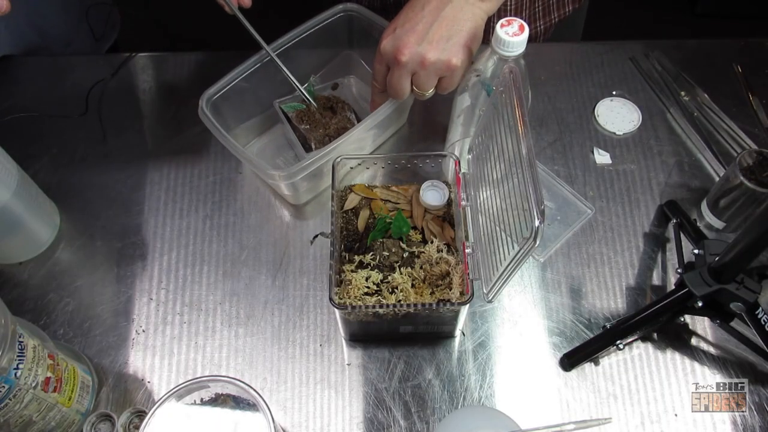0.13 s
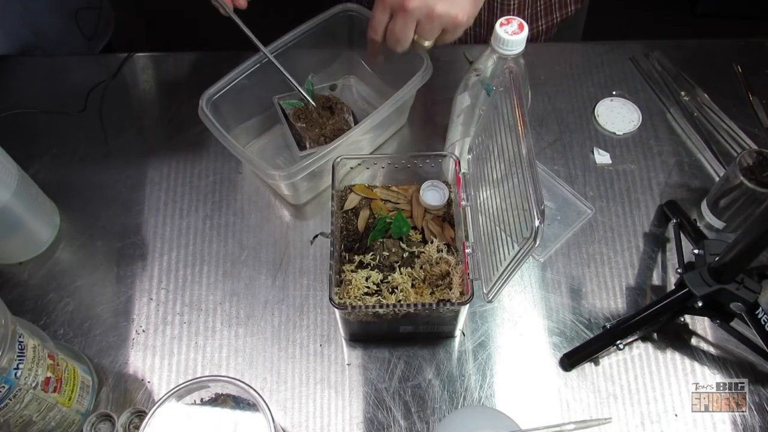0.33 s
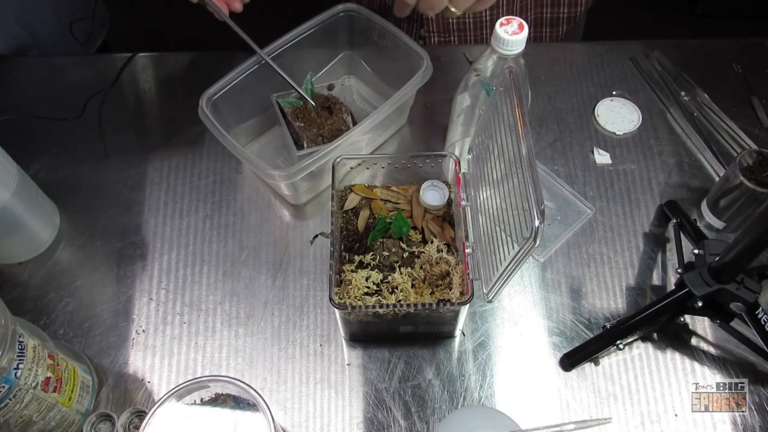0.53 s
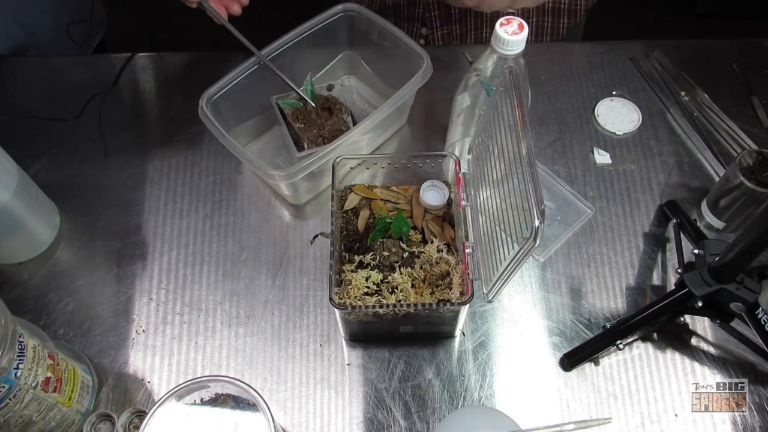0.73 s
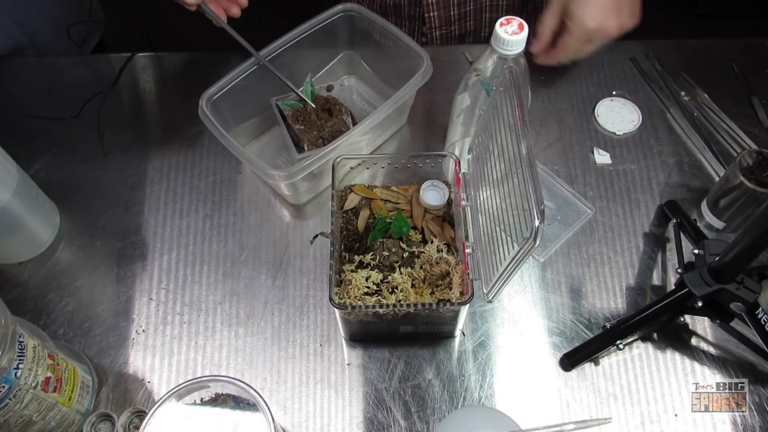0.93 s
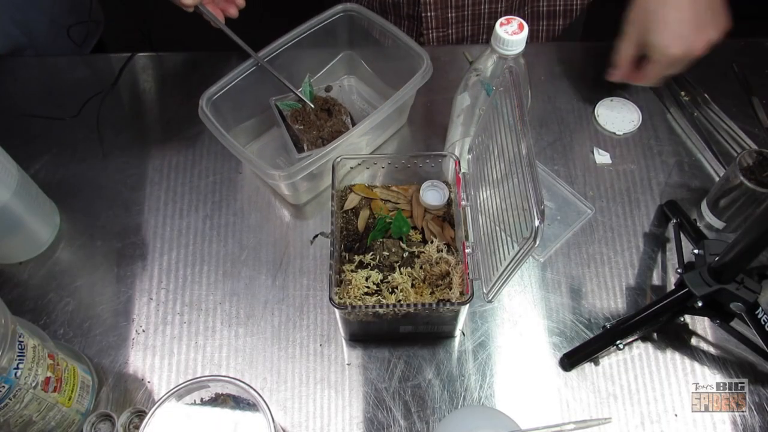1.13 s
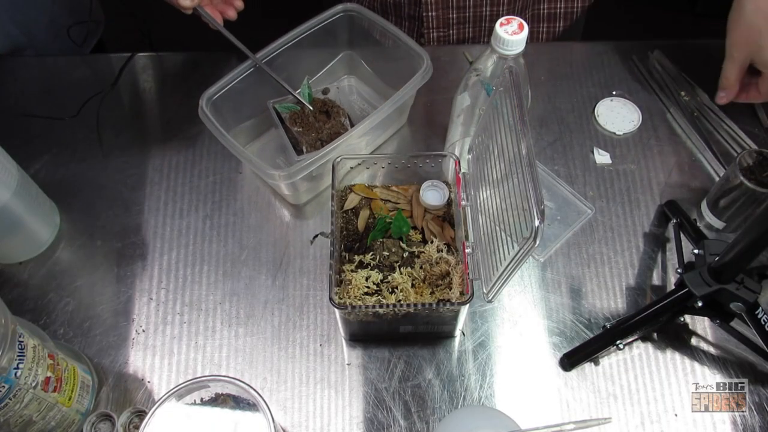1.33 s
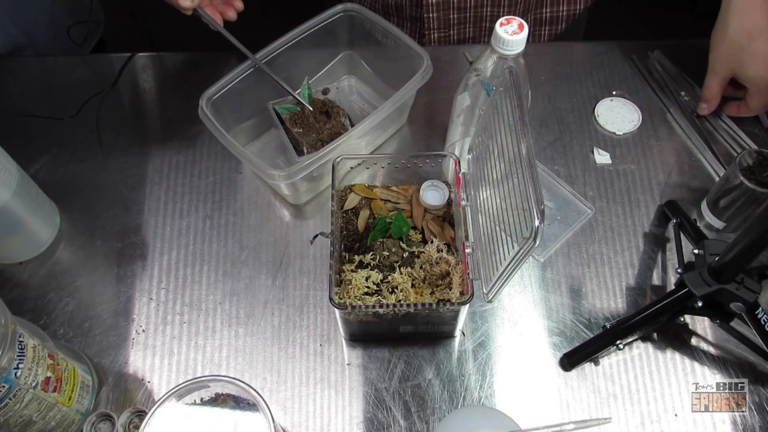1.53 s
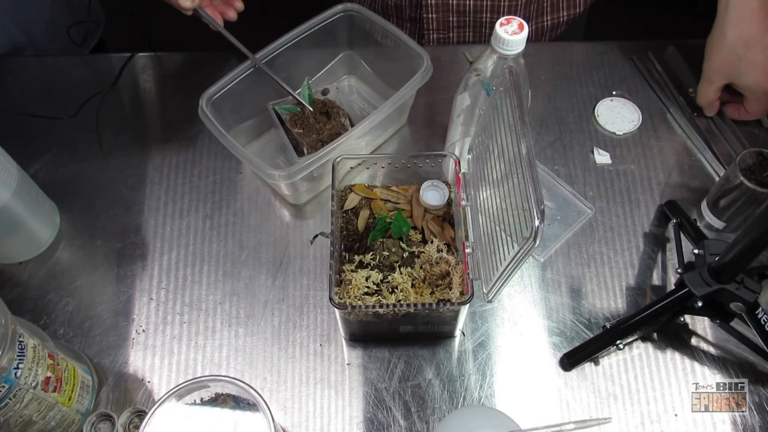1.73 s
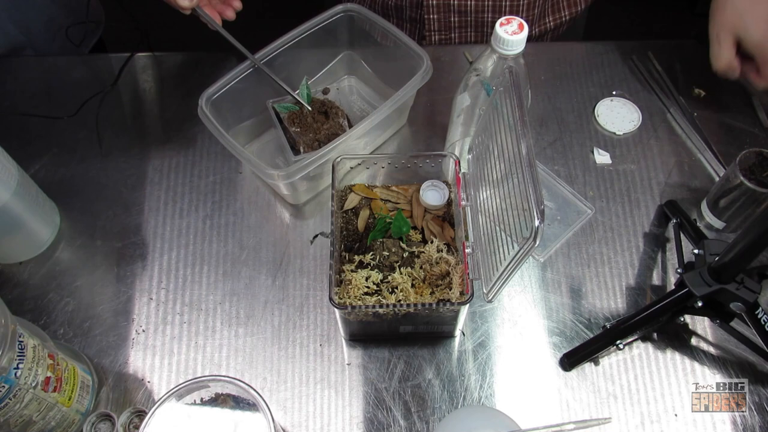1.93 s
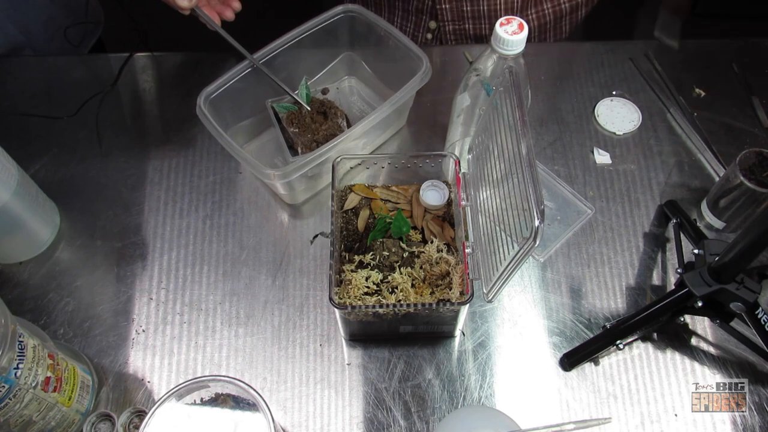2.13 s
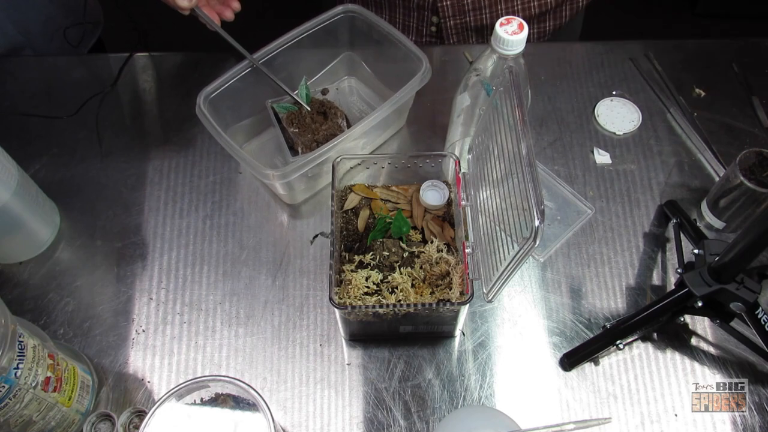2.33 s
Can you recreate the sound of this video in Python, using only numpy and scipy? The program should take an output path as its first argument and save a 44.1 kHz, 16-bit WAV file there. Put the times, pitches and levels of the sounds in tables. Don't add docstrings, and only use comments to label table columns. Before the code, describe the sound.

Tweezers and a hand knock a plastic tub: small ticks and a brief rub at 0.1 s, a loud hollow knock at 0.2 s, then weaker damped knocks until 0.3 s. A sleeve rustles faintly, with soft soil thumps around 0.5, 0.9 and 1.1-1.35 s. Steel tools clack brightly on a metal table at 1.64 and 1.84 s, then tap and scrape lightly until 2.4 s in a quiet small room.

```python
import sys
import numpy as np
from scipy import signal
from scipy.fft import rfft, irfft
from scipy.io import wavfile
from scipy.ndimage import uniform_filter1d

SR = 44100
rng = np.random.default_rng(int(sys.argv[2]) if len(sys.argv) > 2 else 0)


def to_wav(s):
    ch = np.atleast_2d(s).T
    pcm = np.round(np.clip(ch, -1, 1) * 32767)
    wavfile.write(sys.argv[1], SR, pcm.astype(np.int16))


def boost(x):
    u = np.asarray(x, float) / 20
    return 10 ** u


N = 105840

# frequency in Hz, t60 in seconds.
ROOM_T60 = [(200, 0.2), (1000, 0.63), (4000, 0.41), (12000, 0.22)]


def at_hz(points, hz):
    p = np.array(points)
    return np.interp(np.log(np.maximum(hz, 1)), np.log(p[:, 0]), p[:, 1])


def in_time(rows):
    s, db = np.transpose(rows)
    return boost(np.interp(np.arange(N) / SR, s, db))


def rms_one(x):
    return x / np.sqrt(np.mean(x ** 2) + 1e-20)


def noise():
    return rng.standard_normal(N)


def colour(x, spectrum):
    gain = boost(at_hz(spectrum, np.arange(N // 2 + 1) * SR / N))
    return irfft(rfft(x) * rms_one(gain), N)


def rippled(x):
    ripple_db, ripple_hz = 2.5, 40
    size = max(int(ripple_hz * N / SR), 3)
    bumps = uniform_filter1d(rng.standard_normal(N // 2 + 1), size=size)
    bumps = rms_one(uniform_filter1d(bumps, size=size))
    return irfft(rfft(x) * rms_one(boost(ripple_db * bumps)), N)


def drift(rate):
    r = np.exp(-2 * np.pi * rate / SR)
    settle = 9000
    slow = signal.lfilter([1], [1, -2 * r, r * r], rng.standard_normal(N + settle))
    return rms_one(slow[settle:])


def fall(start, t60):
    out, i, t60 = np.zeros(N), int(start * SR), max(t60, .002)
    steps = np.arange(min(N - i, int(1.5 * t60 * SR)))
    out[i:i + len(steps)] = np.exp(-np.log(1000) * steps / SR / t60)
    return out


def click(s, db):
    x = np.zeros(N)
    x[(np.asarray(s) * SR).astype(int)] = boost(db)
    return x


def ring(clicks, hz, t60):
    r, w = boost(-60 / (t60 * SR)), 2 * np.pi * hz / SR
    return signal.lfilter([0, np.sin(w)], [1, -2 * r * np.cos(w), r * r], clicks + 1e-18)


def strike(rows, modes, spread_db):
    s, db = np.transpose(rows)
    luck = rng.standard_normal((len(s), len(modes)))
    out = 0
    for k, (hz, level_db, t60) in enumerate(modes):
        hits = click(s, db + level_db + spread_db * luck[:, k])
        out = out + (-1) ** k * ring(hits, hz, t60)
    return out


def dying_noise(starts, spectrum, t60s):
    out, edges = 0, 130 * 2 ** np.arange(0, 7.1, .5)
    white = [rippled(colour(noise(), spectrum)) for _ in range(2)]
    for k, (low, high) in enumerate(zip(edges, edges[1:])):
        sos = signal.butter(2, [low, high], "band", fs=SR, output="sos")
        band = signal.sosfilt(sos, white[k % 2])
        t60 = at_hz(t60s, np.sqrt(low * high))
        out = out + band * sum(boost(db) * fall(s, t60) for s, db in starts)
    return out


def sliding_grains():
    grains_per_s = 3500
    sizes = boost(4.5 * np.minimum(rng.exponential(1, N), 3)) * rng.choice([-1, 1], N)
    grains = sizes * (rng.random(N) < grains_per_s / SR)
    return .7 * rms_one(grains) + .7 * noise()


def room_air():
    # frequency in Hz, density in dB per Hz.
    air_spectrum = [(15, -3), (50, -1), (95, -3), (150, 2.5), (300, -17.5), (1200, -41.5), (4000, -38.5),
                    (16000, -42)]
    return boost(-60) * colour(noise(), air_spectrum)


def sleeve():
    # time in seconds, level in dB.
    motion = [(.3, -59), (.55, -64), (.8, -57), (.92, -62), (1.15, -57), (1.27, -63), (1.38, -59),
              (1.52, -72.5), (1.7, -75.5)]
    # frequency in Hz, density in dB per Hz.
    cloth = [(120, -11), (250, -2.5), (400, 1.5), (1200, -9), (2200, -22), (4000, -26.5), (8500, -27),
             (12000, -50)]
    flutter = boost(1.2 * drift(20))
    return in_time(motion) * flutter * boost(-0.5) * colour(noise(), cloth)


def hand_rub():
    # time in seconds, level in dB.
    motion = [(0, -69.5), (.04, -51), (.08, -108), (.095, -75), (.099, -48), (.15, -43.5), (.18, -51),
              (.205, -59.5), (.23, -83.5)]
    # frequency in Hz, density in dB per Hz.
    plastic = [(90, -15.5), (150, -5), (600, -5), (1200, -16), (2700, -19), (8000, -37), (14000, -50)]
    uneven = boost(1.2 * drift(40))
    return uneven * in_time(motion) * colour(sliding_grains(), plastic)


def ticks():
    # start in seconds, level in dB,
    # centre in Hz, t60 in seconds.
    contacts = [(0.032, -77, 2400, .05), (0.097, -37.5, 1900, 0.15), (0.107, -41.5, 4700, 0.053),
                (.143, -55, 4000, .015), (.168, -48, 4800, 0.045), (.511, -57, 800, .02),
                (.70, -67, 2500, 0.34), (.757, -64.5, 3280, 0.29), (0.855, -61, 2200, 0.016),
                (.945, -71, 11000, 0.0091), (.955, -70, 2500, 0.013), (1.143, -50.5, 2500, 0.018),
                (1.185, -74, 7800, .01), (1.279, -66, 6800, 0.011), (2.101, -60, 10000, 0.04)]
    snap = 0.77
    out, grit = 0, noise()
    for s, db, hz, t60 in contacts:
        b, a = signal.iirpeak(hz, 1, fs=SR)
        burst = grit * fall(s, t60) + snap * click([s], 0) + 1e-18
        out = out + boost(db + 5.5) * signal.lfilter(b, a, signal.lfilter(b, a, burst))
    return out


def tweezer_tips():
    # time in seconds, level in dB.
    touches = [(.0965, -54), (.1060, -49), (.1435, -51), (.1680, -55), (.5110, -64), (1.1074, -47.5),
               (1.1079, -63), (1.1450, -59), (1.3490, -56), (1.3500, -63), (2.2255, -63)]
    # frequency in Hz, level in dB, t60 in seconds.
    tip_modes = [(910, -1, 0.017), (1700, -4.5, 0.01), (2500, 1, 0.015), (3400, -19, 0.0035),
                 (4370, -11.5, .014), (5200, -7, 0.015), (6360, -14, .008), (7840, -20, .008)]
    return strike(touches, tip_modes, spread_db=2.5)


def thumps():
    # time in seconds, level in dB, pitch in Hz.
    pushes = [
        (0.145, -45, 198),
        (.510, -48, 217),
        (0.857, -39.5, 149),
        (.955, -44.5, 214),
        (1.111, -39, 170),
        (1.148, -38.5, 143),
        (1.352, -47, 133),
        (1.986, -45.5, 215),
        (2.225, -43.5, 326),
    ]
    # frequency in Hz, density in dB per Hz.
    puff = [(150, -1), (350, 1), (900, -3.5), (2500, -23.5), (5000, -25.5), (9000, -72)]
    out = colour(noise(), puff) * sum(boost(db - 9) * fall(s, 0.13) for s, db, hz in pushes)
    out = signal.sosfilt(signal.butter(2, 5000, fs=SR, output="sos"), out)
    for s, db, hz in pushes:
        push = signal.lfilter(np.hanning(90) / 44.5, 1, -click([s], db))
        velocity = np.gradient(push) * SR / (2 * np.pi * hz)
        out = out + ring(velocity, hz, 0.075)
        out = out + boost(-8) * ring(push, 1.5 * hz, 0.09)
        out = out + boost(-25) * ring(push, 5.4 * hz, 0.012)
    return out


def tub():
    # time in seconds, peak in dB, extra treble in dB.
    knocks = [
        (0.2154, -14, -1),
        (.2203, -41.5, 24),
        (0.244, -30, -6.5),
        (0.2703, -25, -12),
        (0.292, -30.5, -1.5),
    ]
    # frequency in Hz, level in dB, t60 in seconds.
    wall_modes = [(259.3, -15.5, 0.18), (347.6, 3.5, 0.036), (490.4, 2, 0.037), (523.5, -13, 0.12),
                  (747, -16.5, 0.025), (1576, -21, 0.075), (2060, -27, 0.022), (2213, -25.5, 0.077),
                  (2350, -29, 0.065), (3650, -26, .04), (4620, -10, 0.01)]
    # frequency in Hz, level in dB, t60 in seconds.
    cavity = (417, 0.92, 0.091)
    # frequency in Hz, density in dB per Hz.
    rattle_spectrum = [(300, -20), (700, 11), (2200, 9), (3300, -1), (5000, -3), (8300, -20), (9500, -42),
                       (16000, -50)]
    # time in seconds, level in dB.
    crackles = [(.2155, -46), (.2206, -46), (.2260, -50), (.2332, -50), (.2418, -50.5), (.2470, -59),
                (.2620, -61), (.2700, -64), (.2780, -58), (.2840, -59), (.2932, -52), (.2965, -58.5)]
    # frequency in Hz, level in dB, t60 in seconds.
    rim_modes = [(4580, -4.5, 0.022), (5380, -6, .008), (6570, -2.5, .008), (7560, -2.5, 0.0062),
                 (8670, -12.5, 0.0031)]
    held = .45
    flip_hz = 400
    s, db, treble_db = np.transpose(knocks)
    wall = 0
    for rows, damping in [(slice(0, 2), 1), (slice(2, None), held)]:
        for hz, level_db, t60 in wall_modes + [cavity]:
            lag_s = .00075 if hz == cavity[0] and damping == 1 else 0
            hit_db = db + treble_db * (hz > 1000)
            hit = signal.lfilter(np.hanning(12) / 5.5, 1, click(s[rows] + lag_s, hit_db[rows]))
            wall = wall + np.sign(flip_hz - hz) * boost(level_db) * ring(hit, hz, t60 * damping)
    wall = signal.sosfilt(signal.butter(1, 90, "high", fs=SR, output="sos"), wall)
    rattle_fall = sum(boost(d + e - db[0]) * fall(t, 0.15) for t, d, e in knocks)
    rattle = boost(-41.5 + 2 * drift(150)) * colour(noise(), rattle_spectrum) * rattle_fall
    echoes = [(s[0] + 0.0079, db[0] - 19), (s[3] + 0.0046, db[0] - 32.5)]
    echo_spectrum = [(120, -11), (250, 1.0), (450, 4.5), (700, -19.0), (2000, -35.0), (9000, -51)]
    room = dying_noise(echoes, echo_spectrum, ROOM_T60)
    return wall + rattle + room + strike(crackles, rim_modes, spread_db=4)


def pings():
    starts = [.3265, 1.593, 2.010, 2.042, 2.050, 2.098, 2.255, 2.293, 2.386]
    # level in dB, frequency in Hz, t60 of the drive in seconds.
    rings = [(-61.5, 4300, 0.26), (-72, 4200, 0.055), (-55.5, 2310, 0.13), (-54, 2630, 0.051),
             (-55, 2920, 0.17), (-67, 15400, .06), (-54.5, 2300, 0.028), (-48.5, 2580, 0.051),
             (-80, 3700, 0.1)]
    blur_s = .016
    out, grit = 0, noise()
    for s, (db, hz, t60) in zip(starts, rings):
        out = out + boost(db - 11) * ring(grit * fall(s, t60), hz, blur_s)
    return out


def clacks():
    # time in seconds, level in dB, bounce delay in seconds, bounce level in dB.
    landings = [
        (1.639, -24.5, .058, -19),
        (1.8390, -28, 0.059, -27),
    ]
    # frequency in Hz, level in dB, t60 in seconds.
    first_tool = [(200.4, -4, 0.2), (361.3, 4, 0.21), (975, 1.5, .06), (603, -2.5, 0.099), (1070, 7, 0.072),
                  (2073, 1, 0.045), (3580, -6, 0.32), (4116, 1.5, 0.11), (5150, 2, 0.07), (6240, -9, 0.27),
                  (7957, 0, 0.11), (8330, -10, 0.077), (11130, -11, 0.13), (11130, 2.5, 0.044)]
    second_tool = [(332.5, -0.5, 0.11), (810, 2.5, 0.19), (1567, 9.5, 0.036), (1610, -4, 0.23),
                   (2090, 0.5, 0.096), (2650, 4, 0.078), (3400, -1, .08), (4097, -5, 0.13),
                   (4500, 0.5, 0.12), (6040, -5, .13), (6980, 2.5, .07), (8940, 4.5, 0.049),
                   (10590, 3, 0.056), (11750, 5, 0.032)]
    ring_levels = [-36.5, -38]
    # frequency in Hz, density in dB per Hz.
    first_sheet = [(120, -11.5), (250, -9), (600, -12.5), (1040, -2.5), (1500, -9.5), (3000, -12),
                   (9000, -6), (15500, -11.5)]
    second_sheet = [(120, -11.5), (330, -8), (600, -8), (1500, -1.5), (2700, -5), (6000, -6), (11500, -4),
                    (15500, -13)]
    # frequency in Hz, t60 in seconds.
    sheet_t60 = [(200, 0.76), (1000, 0.22), (4000, 0.16), (12000, 0.047)]
    room_db = -14
    out = 0
    for (s, db, later, bounce_db), modes, ring_db, sheet in zip(
            landings, [first_tool, second_tool], ring_levels, [first_sheet, second_sheet]):
        contacts = [(s + 0.00072, db - 5), (s + 0.003, db - 14), (s + later, db + bounce_db)]
        out = out + dying_noise(contacts, sheet, sheet_t60)
        out = out + dying_noise([(s + 0.0049, db + room_db)], sheet, ROOM_T60)
        hits = click([s, s + later], [ring_db, ring_db + bounce_db])
        for k, (hz, level_db, t60) in enumerate(modes):
            out = out + (-1) ** k * boost(level_db) * ring(np.roll(hits, 9 * k), hz, t60)
    return out


def tool_slide():
    # time in seconds, level in dB.
    motion = [(1.9, -100), (1.96, -52), (2.015, -51.5), (2.035, -54), (2.055, -50.5), (2.11, -51.5),
              (2.17, -58.5), (2.24, -57), (2.258, -50.5), (2.3, -53.5), (2.325, -56.5), (2.4, -60.5)]
    # frequency in Hz, density in dB per Hz.
    steel = [(90, -4.5), (300, 0), (1200, -10), (2500, -18.5), (3700, -22), (5000, -18), (7000, -23.5),
             (15500, -41)]
    # frequency in Hz, level in dB, t60 in seconds.
    sing_modes = [(1730, -39, .02), (2360, -34.5, 0.0086), (2900, -35, .012), (4800, -35, .008),
                  (6500, -38, 0.0078)]
    grains = sliding_grains()
    sings = sum(boost(db) * ring(grains, hz, t60) for hz, db, t60 in sing_modes)
    uneven = boost(1.2 * drift(40))
    return uneven * in_time(motion) * (sings + colour(grains, steel))


def steel_taps():
    # time in seconds, level in dB.
    contacts = [(1.9698, -49), (1.9781, -44), (2.0080, -57), (2.0120, -62), (2.0208, -57), (2.0505, -54.5),
                (2.0570, -61), (2.0755, -71), (2.2295, -59.5), (2.2540, -67), (2.2650, -57), (2.2790, -57),
                (2.2950, -65)]
    # frequency in Hz, level in dB, t60 in seconds.
    tap_modes = [(2200, 1.5, 0.027), (2990, 0.5, 0.013), (4620, 2, 0.015), (5200, -1, 0.01),
                 (6550, -2, 0.012), (8470, 3.5, 0.0032), (10600, -6, 0.0037), (12600, -7, .005),
                 (14600, -6, .005)]
    return strike(contacts, tap_modes, spread_db=3.5)


def scene():
    # frequency in Hz, density in dB per Hz.
    side_hiss = [(700, -60), (1500, 0), (2200, -9), (3000, -6), (8000, -9), (15500, -8)]
    mid = room_air() + sleeve() + hand_rub() + ticks() + tweezer_tips() + thumps()
    mid = mid + tub() + pings() + clacks() + tool_slide() + steel_taps()
    high = signal.sosfilt(signal.butter(4, 800, "high", fs=SR, output="sos"), mid)
    bright = high + .8 * np.diff(high, prepend=0)
    side = boost(-30) * signal.lfilter([-.6, 0, 0, 1], [1, 0, 0, -.6], bright)
    side = side + boost(-86) * colour(noise(), side_hiss)
    return np.array([mid + side, mid - side])


def band_limit(x):
    return signal.sosfilt(signal.butter(12, 17000, fs=SR, output="sos"), x)


def record(dry):
    top_hz = 15800
    low_pass = signal.cheby2(10, 50, top_hz * 1.04, fs=SR, output="sos")
    mix = signal.sosfilt(low_pass, dry)
    return band_limit(mix)


dry = scene()
out = record(dry)
to_wav(out)
```